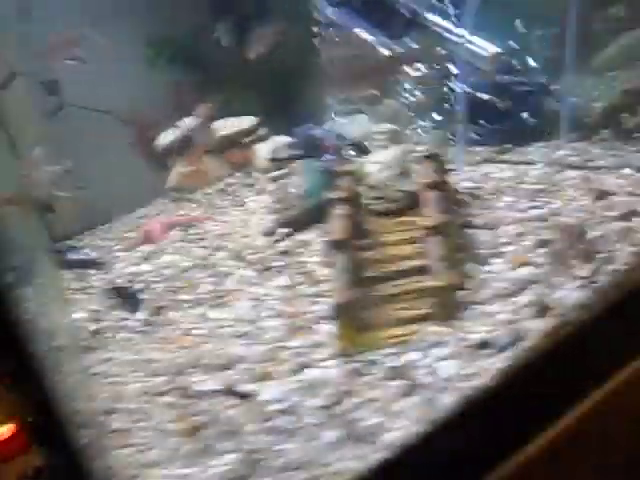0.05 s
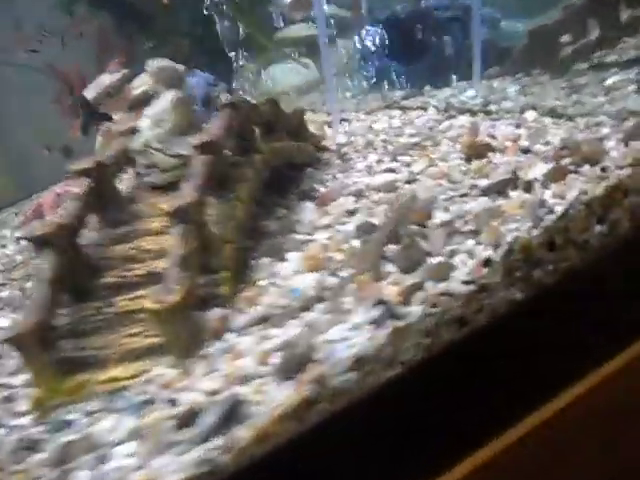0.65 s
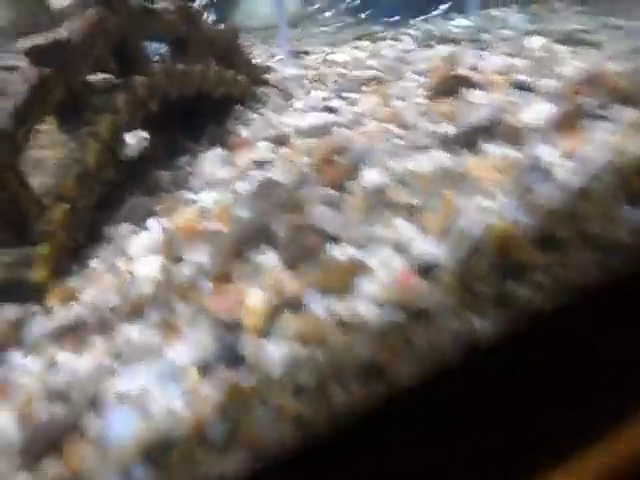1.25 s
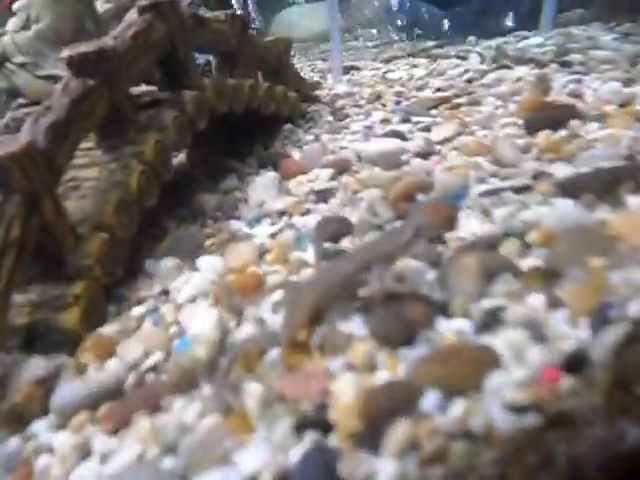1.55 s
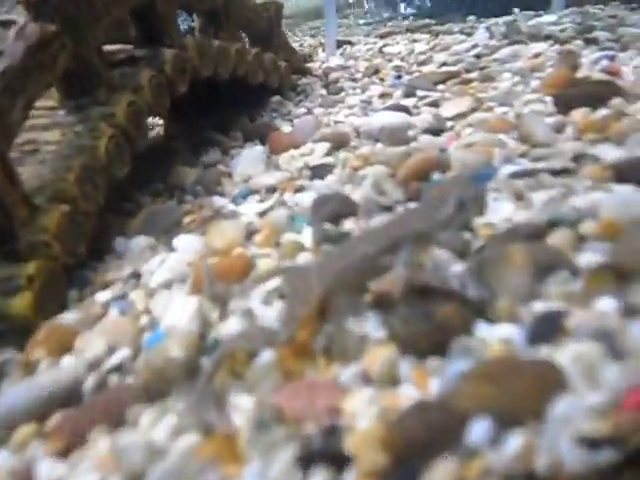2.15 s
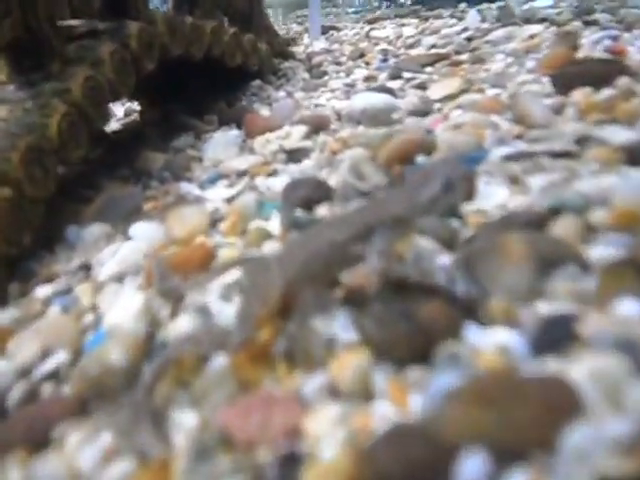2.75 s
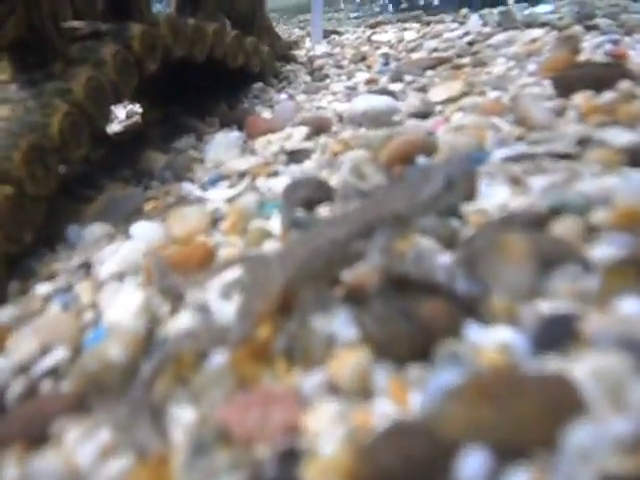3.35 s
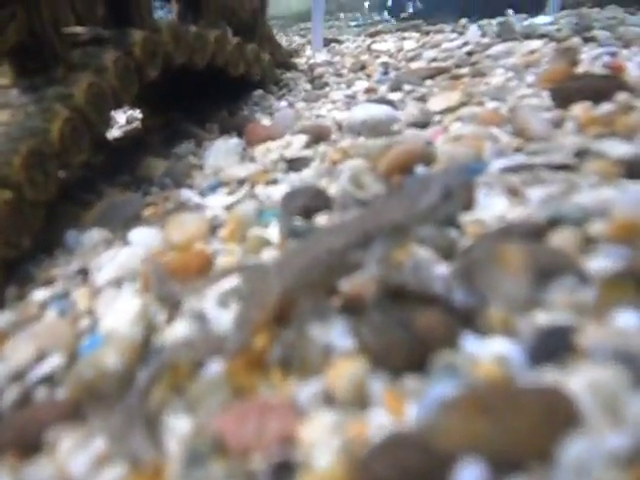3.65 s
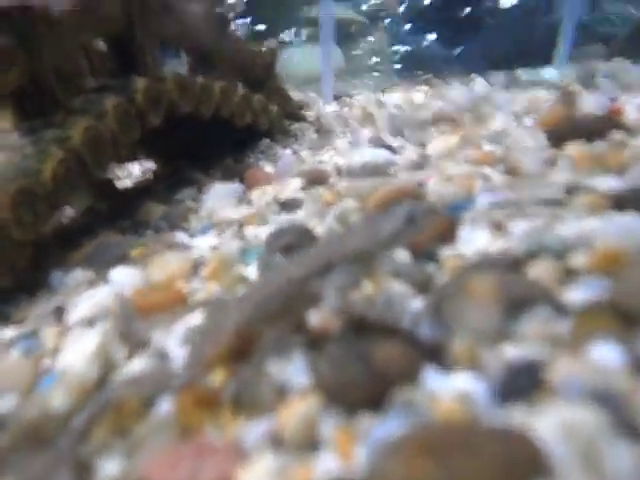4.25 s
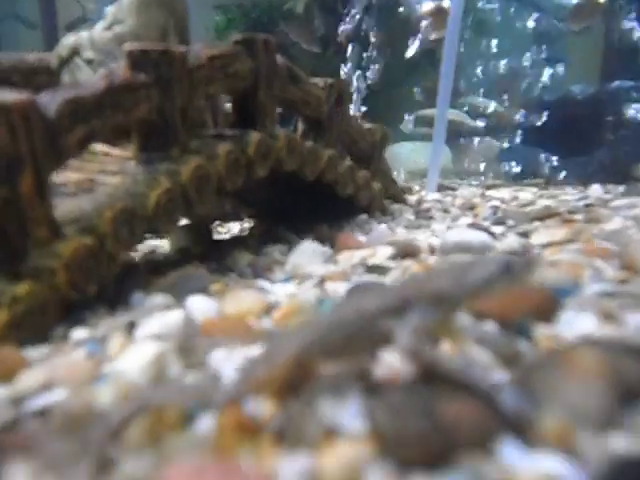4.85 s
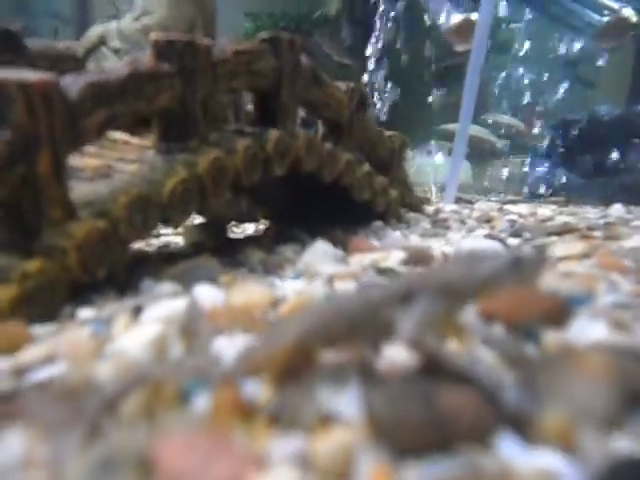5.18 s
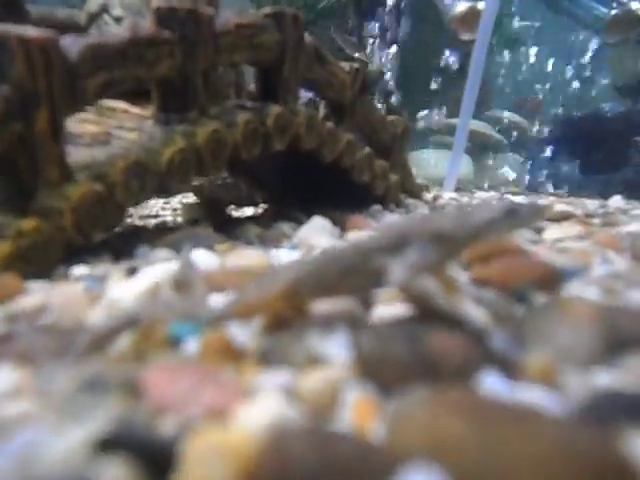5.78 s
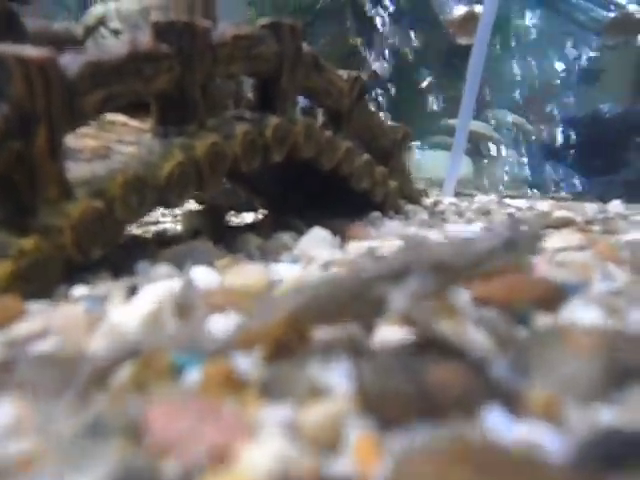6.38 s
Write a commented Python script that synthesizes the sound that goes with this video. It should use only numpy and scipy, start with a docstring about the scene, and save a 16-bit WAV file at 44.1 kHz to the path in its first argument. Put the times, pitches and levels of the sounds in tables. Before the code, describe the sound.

An aquarium pump hums and water bubbles faintly while a handheld camera knocks against the glass, once very hard.

```python
"""An aquarium pump hums on 50 Hz mains while bubbling water fizzes faintly over an even hiss.
Fingers rub on a handheld camera, which scuffs and knocks against the glass. As it creeps closer
the water and the buzzing tank walls grow louder; more knocks follow, then its casing ticks.
At 4.6 s the hardest knock overloads the microphone. The deepest hum holds steady while
everything else is turned down for good, and a few lighter knocks end the scene."""
import sys
import numpy as np
from scipy import signal
from scipy.fft import rfft, irfft, next_fast_len
from scipy.io import wavfile

SR = 44100
rng = np.random.default_rng(int(sys.argv[2]) if len(sys.argv) > 2 else 0)


def dump(signal):
    """Clip the signal to [-1, 1] and save it as 16-bit WAV at the path in sys.argv[1]."""
    limited = np.clip(np.atleast_2d(signal).T, -1, 1)
    pcm = np.round(limited * 32767).astype(np.int16)
    wavfile.write(sys.argv[1], SR, pcm)


N = 292112
TIME = np.arange(N) / SR
CLICK = signal.unit_impulse(2048)


def from_db(db):
    """Turn decibels into a volume factor."""
    return 10 ** (np.asarray(db) / 20)


def drift(hz, step=40):
    """A smooth random wobble, about 1 in size; more hz makes it quicker."""
    r = np.exp(-2 * np.pi * hz * step / SR)
    slow = signal.lfilter([1], [1, -2 * r, r * r], rng.standard_normal(N // step + 2002))[2000:]
    return np.interp(np.arange(N) / step, np.arange(len(slow)), slow / slow.std())


def noise(spectrum):
    """Steady noise with the given power per Hz."""
    hz, level_db = np.transpose(spectrum)
    size = next_fast_len(N)
    bins = np.maximum(np.arange(size // 2 + 1) * SR / size, 1)
    colour = from_db(np.interp(np.log(bins), np.log(hz), level_db))
    return irfft(rfft(rng.standard_normal(size)) * colour, size)[:N] * np.sqrt(SR / 2)


def resonate(x, hz, width_hz):
    """Ring at one pitch; the narrower the width, the longer the ring."""
    r = np.exp(-np.pi * width_hz / SR)
    feedback = [1, -2 * r * np.cos(2 * np.pi * hz / SR), r * r]
    return signal.lfilter(np.array([1, 0, -1]) * (1 - r * r) / 2, feedback, x + 1e-18)


def soften(x, hz):
    """A softer touch spreads out in time and loses its treble above hz, its 'hardness'."""
    return signal.sosfilt(signal.bessel(4, min(hz, SR / 3), fs=SR, norm="mag", output="sos"), x + 1e-18)


def add(track, s, sound):
    """Lay a short sound into a track at s seconds."""
    start = max(round(s * SR), 0)
    track[start:start + len(sound)] += sound[:max(N - start, 0)]


def mains_tones(tones, waver_db, mains_hz=50):
    """Shaking in step with the mains; each tone wavers with the load of the water."""
    phase = 2 * np.pi * mains_hz * TIME
    return np.sqrt(2) * sum(
        from_db(db + waver_db * drift(7.2)) * np.sin(multiple * phase + rng.uniform(0, 2 * np.pi))
        for multiple, db in tones)


# the pump's higher tones: multiple of the mains, level/dB
PUMP_TONES = [(2, -61.5), (3, -65.5), (4, -63.5), (5, -57.5), (6, -76.5), (8, -77), (9, -72), (10, -72.5),
              (12, -76)]

def pump_hum(near_db, swell_start_s=4.55, swell_s=.4, swell_db=3):
    """The hum fills the room; its deepest tone swells as the gain drops, so it seems to hold steady."""
    overtones = from_db(0.22 * near_db) * mains_tones(PUMP_TONES, waver_db=.5)
    swell = np.clip((TIME - swell_start_s) / swell_s, 0, 1)
    deep = mains_tones([(1, -51.494)], waver_db=0.54)
    return overtones + from_db(.55 * near_db + swell_db * swell) * deep


# tones of the tank walls: multiple of the mains, level/dB
WALL_TONES = [(13, -63), (14, -68.5), (15, -69.5)]

def wall_buzz(near_db):
    """The pump shakes the tank walls, which is heard best close to the glass."""
    return from_db(1.2 * near_db) * mains_tones(WALL_TONES, waver_db=1.3)


def bubbles(per_s, level_db, sharpness, sizes=14):
    """Air bubbles burst at random, each ringing briefly at a pitch set by its size."""
    bursts = rng.random(N) < per_s / SR
    pops = bursts * from_db(2.2 * np.minimum(rng.exponential(1, N), 3)) * rng.choice([-1, 1], N)
    size = rng.integers(0, sizes, N)
    pitches_hz = np.geomspace(420, 1500, sizes)
    fizz = sum(resonate(pops * (size == k), hz, hz / sharpness) / hz for k, hz in enumerate(pitches_hz))
    return from_db(level_db) * fizz / fizz.std()


# water noise through the glass: f/Hz, level/dB (per Hz)
WATER_NOISE = [(25, -93.5), (80, -89), (125, -84), (170, -90.5), (260, -87), (340, -91), (470, -97.5),
               (570, -92), (660, -88.5), (780, -95.5), (950, -93), (1400, -102), (2800, -107), (6000, -125)]

def water(near_db):
    """Water full of air rushes and fizzes behind the glass."""
    rush = noise(WATER_NOISE) * from_db(drift(11))
    return from_db(near_db) * (rush + bubbles(per_s=150, level_db=-67.5, sharpness=18))


# background hiss: f/Hz, level/dB (per Hz)
HISS_NOISE = [(25, -85), (130, -91.5), (300, -94), (600, -99), (1500, -100.5), (2700, -100.5),
              (4000, -102.5), (7000, -104), (10000, -105.5), (11000, -120), (12000, -126)]

def hiss():
    """An even hiss lies behind everything."""
    return noise(HISS_NOISE)


# fingers shifting their grip: t/s, length/s, level/dB
FINGER_RUBS = [(0, 0.18, -76), (4.04, 0.34, -68.5), (6.46, .15, -69)]

def finger_rubs(hz=2650, width_hz=400, uneven_db=2.0, fade_db_per_s=89):
    """Skin rubs unevenly on the camera's shell; each bright rub swells, holds and fades."""
    rub = resonate(rng.standard_normal(N), hz, width_hz)
    pressure = sum(from_db(db - fade_db_per_s * np.abs(TIME - np.clip(TIME, s, s + length)))
                   for s, length, db in FINGER_RUBS)
    return rub / rub.std() * pressure * from_db(uneven_db * drift(30))


# pitches at which the camera's shell rings: f/Hz, width/Hz, level/dB
SHELL_RINGS = [(284, 88, -16), (441, 174, -12), (625, 196, -9), (880, 273, -2), (1180, 148, -6.5),
               (1550, 200, -13), (2100, 337, -13), (2703, 270, -9), (4030, 300, -16.5), (4570, 410, -16.5),
               (5310, 840, -14.5), (6810, 360, -20.5), (10120, 3100, -17.5)]

def camera_shell(force):
    """A push on the shell makes it ring briefly at many pitches at once."""
    return sum(from_db(db) * resonate(force, hz, width_hz) for hz, width_hz, db in SHELL_RINGS)


# the camera's edge sliding on the glass: t/s, length/s, level/dB, hardness/Hz
GLASS_SCUFFS = [(.005, 0.026, -37, 1900), (2.6932, 0.015, -12, 2150), (2.77, 0.014, -33.5, 2380),
                (4.064, 0.033, -39, 3200), (4.514, 0.058, -38, 1406), (4.762, 0.031, -37.5, 1830),
                (5.204, 0.17, -41, 1710), (6.484, 0.033, -34.5, 2400)]

def scuffs(slips_per_s=8300):
    """Each scuff is a rush of tiny slips that shake the shell."""
    force = np.zeros(N)
    for s, length, level_db, hard_hz in GLASS_SCUFFS:
        span = int(length * SR)
        slips = rng.standard_normal(N) * (rng.random(N) < slips_per_s / SR) * np.sqrt(SR / slips_per_s)
        slide = slips[:span] * signal.windows.tukey(span, .5)
        add(force, s, from_db(level_db) * soften(slide, hard_hz))
    return camera_shell(force)


def reflections(x, level_db, fade_s, dull_hz, size=4096):
    """Glass, hood and stand close by throw back a brief, dull echo."""
    t = TIME[:size]
    tail = soften(rng.standard_normal(size), dull_hz) * from_db(-60 * t / fade_s) * (t > .002)
    tail *= np.sqrt(2 * dull_hz / SR / np.sum(tail ** 2))
    return x + from_db(level_db) * signal.fftconvolve(x, tail)[:N]


# the camera bumping the tank:
# t/s, level/dB, hardness/Hz, thump level/dB, glass ring f/Hz, ring level/dB, loss per bounce/dB
GLASS_KNOCKS = [(0.2159, 4, 3000, 13, 2600, -8, 17), (2.6925, 17, 1230, 6.5, 460, -8, 24),
                (2.6985, 7.5, 2400, 15, 1900, 7.5, 8), (2.7043, 11, 2130, 2, 1086, 3, 11),
                (2.7871, -3, 1800, 1, 1060, -4, 8), (4.5747, 29.5, 6830, 8, 1274, 1.5, 51),
                (5.2694, 4, 3000, 12.5, 646, 10, 3.5), (5.6003, -2.5, 2100, 5, 770, 2, 5),
                (6.4582, 1.5, 2620, 6, 1580, 2.5, 7), (6.5251, -1, 2520, 9.5, 1070, 0, 22)]

def knocks(bounce_s=.0022, bounce_hardness=0.68, thump_hz=328):
    """The camera lands and bounces twice, softer each time; shell and glass ring, the stand thumps."""
    force, jolt, glass = np.zeros((3, N))
    for s, level_db, hard_hz, thump_db, ring_hz, ring_db, loss_db in GLASS_KNOCKS:
        for bounce in range(3):
            at = s + bounce * bounce_s
            touch = from_db(-bounce * loss_db) * CLICK
            blow = from_db(level_db) * soften(touch, hard_hz * bounce_hardness ** bounce)
            add(force, at, blow)
            add(glass, at, from_db(ring_db) * resonate(blow, ring_hz, width_hz=93))
            add(jolt, at, from_db(thump_db) * soften(touch, thump_hz))
    thump = signal.sosfilt(signal.butter(1, 90, "high", fs=SR, output="sos"), jolt + 1e-18)
    stand = from_db(-6.5) * resonate(jolt, hz=150, width_hz=87)
    return camera_shell(force) + glass + thump + stand


# small ticks of the camera's casing: t/s, level/dB, ring f/Hz
CASING_TICKS = [(2.9948, -10, 750), (3.0679, -17, 1000), (3.4534, -13, 785), (4.0820, -13.5, 1800),
                (4.0948, -16, 2100), (4.1280, -14, 1440), (4.3287, -12, 2570), (4.4020, -15.5, 1500),
                (5.127, -12, 554)]

def casing_ticks(ring_db=6):
    """The casing ticks under the fingers; the higher the ring, the harder the tick."""
    force, rings = np.zeros((2, N))
    for s, level_db, ring_hz in CASING_TICKS:
        tick = from_db(level_db) * soften(CLICK, 1.85 * ring_hz)
        add(force, s, tick)
        add(rings, s, from_db(ring_db) * resonate(tick, ring_hz, width_hz=66))
    return camera_shell(force) + rings


def scene(far_db=-5.5, close_db=1.16, approach_s=2.13):
    """The tank grows louder as the camera closes in, slowing as it nears the glass."""
    near_db = close_db + (far_db - close_db) * np.exp(-TIME / approach_s)
    tank = water(near_db) + wall_buzz(near_db) + pump_hum(near_db)
    camera = reflections(scuffs() + knocks() + casing_ticks(), level_db=-20.5, fade_s=0.03, dull_hz=3000)
    return (tank + camera + hiss() + finger_rubs())[None]


def gain_control(x, threshold_db=-12.5, most_db=4.5, sink_db_per_s=0.2, react_s=0.0031):
    """A loud peak quickly turns the volume down for good; it also sinks slowly all along."""
    over_db = np.clip(20 * np.log10(np.abs(x) + 1e-9) - threshold_db, 0, most_db)
    sink_db = sink_db_per_s * TIME
    cut_db = np.maximum.accumulate(over_db - sink_db, axis=-1) + sink_db
    r = np.exp(-1 / (react_s * SR))
    return x * from_db(-signal.lfilter([1 - r], [1, -r], cut_db))


def record(dry, ceiling=.8, cutoff_hz=12800):
    """The gain dips, peaks that are still too loud are flattened, and the highest treble is cut."""
    clipped = np.clip(gain_control(dry), -ceiling, ceiling)
    return signal.sosfilt(signal.cheby2(20, 90, cutoff_hz, fs=SR, output="sos"), clipped)


dry = scene()
out = record(dry)
dump(out)
```